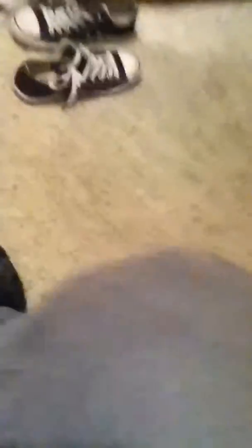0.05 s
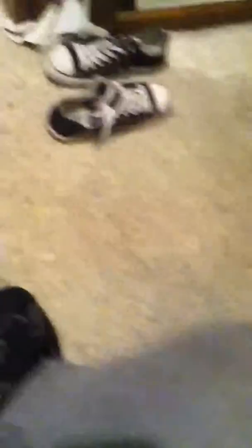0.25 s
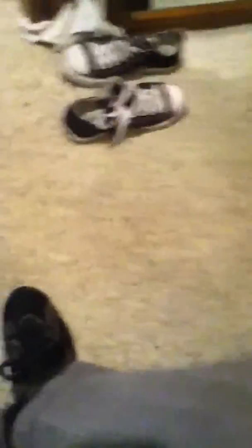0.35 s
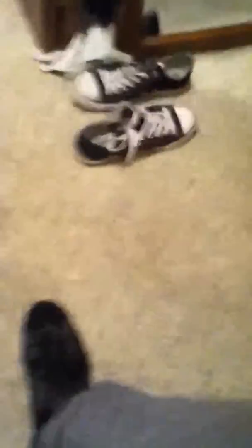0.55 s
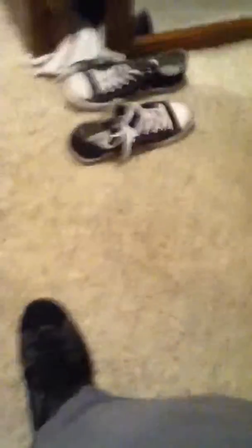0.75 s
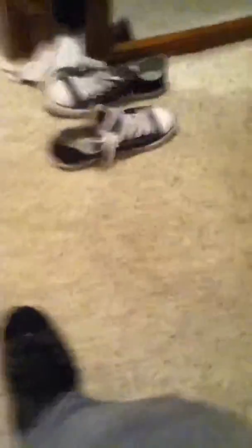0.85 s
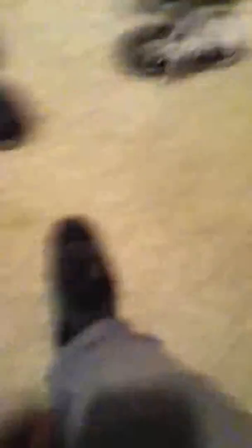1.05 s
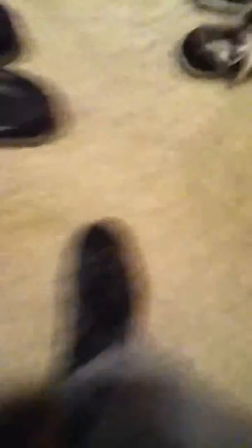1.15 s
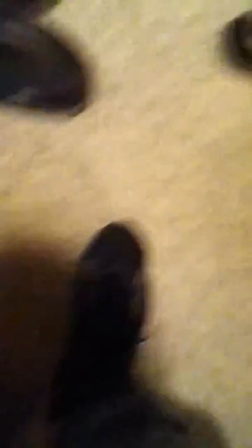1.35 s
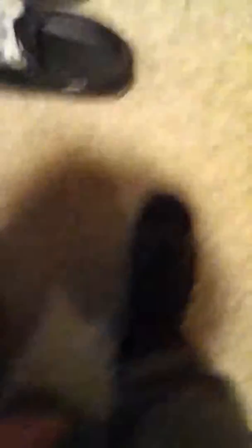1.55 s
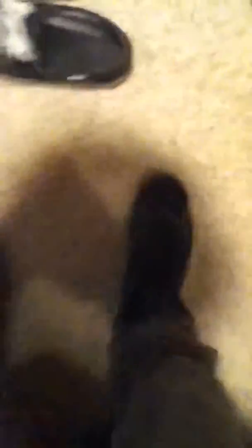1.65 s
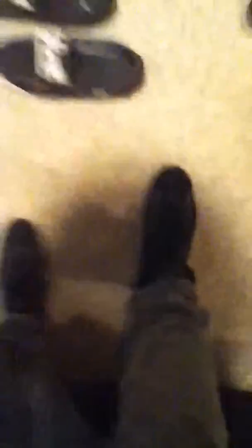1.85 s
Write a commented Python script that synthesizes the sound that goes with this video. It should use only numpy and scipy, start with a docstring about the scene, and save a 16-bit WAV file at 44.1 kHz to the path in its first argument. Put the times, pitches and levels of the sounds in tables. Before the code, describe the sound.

Slow footsteps on carpet, with one sharp shoe snap and rustling trousers.

```python
"""Slow steps on carpet in a small room, heard from a hand-held camera over steady hiss.
Trouser cloth rustles from the start. At 0.25 s a shoe snaps: crack, rattle, hollow ring.
Bright handling ticks and dull crease clicks follow; a heel knocks at 0.59 s.
From about 1 s soles scuff the pile and land with soft thuds, among more ticks and clicks."""
import sys
import numpy as np
from scipy import signal
from scipy.fft import rfft, irfft, next_fast_len
from scipy.io import wavfile
from scipy.ndimage import map_coordinates

SR = 44100
rng = np.random.default_rng(int(sys.argv[2]) if len(sys.argv) > 2 else 0)


def store_pcm(level_fs):
    """Save levels as 16-bit WAV."""
    pcm = np.round(np.clip(level_fs, -1, 1) * 32767).astype(np.int16)
    wavfile.write(sys.argv[1], SR, np.atleast_2d(pcm).T)


N = 83790


def amp(db):
    """Decibels to gain."""
    return 10 ** (np.asarray(db) / 20)


def unit_rms(x):
    """Scale to rms 1."""
    return x / np.sqrt(np.mean(x ** 2) + 1e-20)


def decay(t, t60_s):
    """Gain that falls 60 dB in t60_s."""
    return np.exp(-np.log(1000) * t / t60_s)


def curve_at(points, hz):
    """Interpolate (freq_hz, value) points on a log frequency axis."""
    freqs_hz, values = np.transpose(points)
    return np.interp(np.log(hz + 1), np.log(freqs_hz + 1), values)


def wobble(rate_hz):
    """Straight lines between random knots."""
    return map_coordinates(rng.standard_normal(N), [np.arange(N) * rate_hz / SR], order=1)


def filtered(x, response):
    """Apply response(hz) to the spectrum of x."""
    size = next_fast_len(N + SR // 2)
    return irfft(rfft(x, size) * response(np.fft.rfftfreq(size, 1 / SR)), size)[:N]


def noise(colour, tilt_db_per_oct=0):
    """Coloured noise of rms 1, tilted above 500 Hz."""
    def response(hz):
        octaves = np.log2(np.maximum(hz, 500) / 500)
        return amp(curve_at(colour, hz) + tilt_db_per_oct * octaves)
    return unit_rms(filtered(rng.standard_normal(N), response))


def crack(colour, size=4096):
    """Minimum-phase pulse of a colour, peak 1."""
    cepstrum = irfft(np.log(amp(curve_at(colour, np.fft.rfftfreq(size, 1 / SR)))))
    cepstrum[1:size // 2] *= 2
    cepstrum[size // 2 + 1:] = 0
    pulse = irfft(np.exp(rfft(cepstrum)))
    return pulse / np.abs(pulse).max()


def ring(modes, attack_s):
    """Damped modes after one blow."""
    t = np.arange(SR // 4) / SR
    tones = sum(amp(db) * np.sin(2 * np.pi * hz * t) * decay(t, t60_s) for hz, db, t60_s in modes)
    return tones * (1 - np.exp(-t / attack_s))


def swell(peak_s, level_db, rise_s, fall_s):
    """Gain with a rounded peak; rise_s and fall_s each span 20 dB."""
    roundness = 1.275  # 1 = pointed, 2 = bell
    t = np.arange(N) / SR
    distance = np.maximum((peak_s - t) / rise_s, (t - peak_s) / fall_s)
    return amp(level_db - 20 * distance ** roundness)


def strokes(rows, colour, grain_hz=500, grain_db=2):
    """Friction strokes swell and fade, grainy with catching fibres."""
    out = np.zeros(N)
    for peak_s, level_db, rise_s, fall_s, tilt_db_per_oct in rows:
        friction = noise(colour, tilt_db_per_oct) * amp(grain_db * wobble(grain_hz))
        out += swell(peak_s, level_db, rise_s, fall_s) * unit_rms(friction)
    return out


def add(track, start_s, sound):
    """Mix a sound into the track."""
    part = track[round(start_s * SR):][:len(sound)]
    part += sound[:len(part)]


def in_room(x, wet_db, delay_s=0.006):
    """Add a short room tail; soft furnishings soak up its treble."""
    # reverberation time: freq_hz, t60_s
    room_t60 = [(150, 0.14), (500, 0.35), (2500, 0.16), (10000, 0.3)]
    # tail spectrum: freq_hz, level_db
    colour = [(200, -3.5), (2000, 3.5), (4500, -5.5), (10000, -17)]
    hz, t, spectra = signal.stft(rng.standard_normal(SR // 2), SR, nperseg=256)
    spectra = spectra * decay(t, curve_at(room_t60, hz)[:, None]) * amp(curve_at(colour, hz))[:, None]
    tail = signal.istft(spectra, SR, nperseg=256)[1]
    tail = np.pad(tail / np.linalg.norm(tail), (round(delay_s * SR), 0))
    return x + amp(wet_db) * signal.fftconvolve(x, tail)[:N]


def room_hiss():
    """Steady noise floor of the room."""
    # hiss spectrum: freq_hz, level_db
    colour = [(15, 0), (25, -14.5), (108, -0.5), (212, 0.5), (416, -10), (531, -12.5), (734, -8.5),
              (796, -8.5), (1160, -11), (1520, -13), (5880, -16), (11300, -19), (16000, -29)]
    return amp(-57) * noise(colour)


def trouser_cloth():
    """Cloth slides in swishes, with a bright sheen as the legs pass."""
    # cloth strokes: peak_s, level_db, rise_s, fall_s, tilt_db_per_oct
    swishes = [(.04, -52, 0.29, 0.23, -0.2), (.205, -52, 0.069, 0.041, 1),
               (.267, -39.5, 0.038, 0.038, -2.5), (.33, -51, 0.11, 0.12, 1), (.425, -49.5, 0.15, 0.19, 0),
               (.575, -49.5, 0.084, 0.078, 1), (.65, -49.5, 0.051, 0.033, 0), (.785, -49, 0.23, 0.12, 0.66),
               (1.26, -55.5, 0.36, 0.21, 1.5), (1.61, -58.5, 0.14, 0.16, 3)]
    # swish spectrum: freq_hz, level_db
    swish_colour = [(90, -39), (200, 4.5), (380, 8.5), (900, -5.5), (2200, -1), (4300, -5.5), (8000, -9.5),
                    (12000, -20.5), (16000, -44)]
    # sheen spectrum: freq_hz, level_db
    sheen_colour = [(2000, -16), (5000, -8), (8000, -0.5), (11500, -7), (16000, -17)]
    sheen_gain = swell(peak_s=0.54, level_db=-55.5, rise_s=0.25, fall_s=0.17)
    return strokes(swishes, swish_colour) + sheen_gain * noise(sheen_colour)


def sole_rubs(q=1.56):
    """A loaded sole creeps on the pile and excites one broad resonance."""
    # rubs: peak_s, level_db, rise_s, fall_s, centre_hz
    rubs = [(0.111, -51.5, 0.017, 0.027, 630), (.19, -53.5, 0.045, 0.17, 630),
            (0.604, -47, 0.075, .055, 400), (0.943, -53.5, 0.017, 0.037, 1420), (.95, -60, .1, 0.36, 410),
            (1.052, -49, 0.013, 0.031, 2030), (1.099, -41, 0.0081, 0.048, 382),
            (1.448, -52, 0.054, 0.089, 760), (1.505, -51, .03, 0.055, 2200), (1.68, -60, 0.1, 0.098, 300)]
    out = np.zeros(N)
    for peak_s, level_db, rise_s, fall_s, centre_hz in rubs:
        def band(hz):
            damping = 1j * hz * centre_hz / q
            return (damping / (centre_hz ** 2 - hz ** 2 + damping)) ** 2
        friction = unit_rms(filtered(rng.standard_normal(N), band))
        out += swell(peak_s, level_db, rise_s, fall_s) * friction
    return out


def sole_scuffs():
    """Soles brush the pile."""
    # sole strokes: peak_s, level_db, rise_s, fall_s, tilt_db_per_oct
    scuffs = [(1.079, -37, 0.059, 0.056, -1), (1.45, -51, 0.085, 0.046, -3.5),
              (1.518, -50, 0.053, 0.099, -3.5)]
    # scuff spectrum: freq_hz, level_db
    colour = [(100, -11), (280, 0.5), (700, -4.5), (1300, -1), (2500, -0.5), (4400, 1), (7000, -5),
              (10000, -9), (13000, -21), (16000, -38)]
    return strokes(scuffs, colour)


def crease_clicks(t60_cycles=4.25):
    """Creases in shoe and cloth give way, each at its own heavily damped pitch."""
    # dull clicks: start_s, level_db, pitch_hz
    clicks = [(.0685, -26.5, 3940), (.3996, -34.5, 2500), (.4075, -32.5, 3770), (.4137, -38, 2180),
              (.4226, -33, 1890), (.4304, -37, 2630), (.4418, -36.5, 1870), (.9423, -31, 3800),
              (.9831, -37.5, 2290), (1.0097, -29.5, 4320), (1.0105, -33, 1160), (1.0301, -33.5, 4430),
              (1.4266, -37.5, 950), (1.4346, -37, 1190), (1.4928, -34, 2110)]
    out = np.zeros(N)
    for start_s, level_db, pitch_hz in clicks:
        click = ring([(pitch_hz, 0, t60_cycles / pitch_hz)], attack_s=0.0001)
        add(out, start_s, amp(level_db) * click / np.abs(click).max())
    return in_room(out, wet_db=-15)


def handling_ticks(top_above_hz=10000):
    """Small hard parts touch and ring briefly; glancing touches favour the top mode."""
    # touches: start_s, peak_db, top_boost_db
    ticks = [(0.3539, -25.5, 2), (.8856, -36, 12), (1.1693, -25.5, 2), (1.2253, -33, 12),
             (1.3424, -24.5, 1.5), (1.3455, -30.5, 6)]
    # modes of the parts: pitch_hz, level_db, t60_s
    modes = [(2900, -13, 0.0032), (3950, -12, 0.0041), (8510, 6, 0.0021), (11350, -6, 0.0028)]
    out = np.zeros(N)
    for start_s, peak_db, top_boost_db in ticks:
        boosted = [(hz, db + top_boost_db * (hz > top_above_hz), t60_s) for hz, db, t60_s in modes]
        tick = ring(boosted, attack_s=0.00016)
        add(out, start_s, amp(peak_db) * tick / np.abs(tick).max())
    return out


def footfalls(heel_s=0.5866):
    """A heel knocks through the carpet; softer contacts only thud."""
    # heel knock modes: pitch_hz, level_db, t60_s
    heel_modes = [(191, -12, 0.1), (431, 2, 0.039), (517, -10, 0.028)]
    # heel click spectrum: freq_hz, level_db
    click_colour = [(200, -10), (1000, -1.5), (2200, -6), (3500, -16), (8000, -24), (16000, -57)]
    # weight landing on the floor: start_s, level_db, pitch_hz, t60_s
    thuds = [(1.089, -37, 346, 0.045), (1.091, -38, 557, 0.024), (1.108, -44, 200, 0.064),
             (1.129, -37.5, 127, 0.064), (1.133, -46, 55, 0.094), (1.327, -42.5, 141.5, 0.08),
             (1.497, -47, 95, .05), (1.519, -40.5, 215, 0.084), (1.523, -38.5, 478, 0.039),
             (1.789, -46.5, 97, 0.07)]
    out = np.zeros(N)
    add(out, heel_s, amp(-26.5) * ring(heel_modes, attack_s=0.0023))
    add(out, heel_s, amp(-28) * crack(click_colour))
    for start_s, level_db, pitch_hz, t60_s in thuds:
        add(out, start_s, ring([(pitch_hz, level_db, t60_s)], attack_s=0.0021))
    return in_room(out, wet_db=-17)


def shoe_snap(start_s=0.2485, low_cut_hz=140):
    """One hard crack, a brief rattle and a hollow ring; the small shoe radiates little bass."""
    # crack spectrum: freq_hz, level_db
    crack_colour = [(60, -43), (130, -24), (220, -1.5), (620, -2), (1150, -15), (1800, 2), (2450, 2),
                    (3100, -6.5), (3900, 1.5), (4850, 2.5), (6400, -7), (8700, -19), (11500, -30),
                    (16000, -38)]
    # rattle spectrum: freq_hz, level_db
    rattle_colour = [(100, -32), (400, 2), (1200, -11), (2200, 5), (4400, 0.5), (7000, -6), (12000, -21),
                     (16000, -35)]
    # shoe and floor modes: pitch_hz, level_db, t60_s
    modes = [(195, -39, 0.057), (351, -22, 0.025), (576, -23, 0.024)]
    out, t = np.zeros(N), np.arange(N) / SR
    add(out, start_s, amp(-8.5) * crack(crack_colour))
    add(out, start_s, amp(-27.5) * noise(rattle_colour) * decay(t, t60_s=0.024))
    add(out, start_s, -ring(modes, attack_s=0.00099))
    radiated = filtered(out, lambda hz: 1j * hz / (low_cut_hz + 1j * hz))
    return in_room(radiated, wet_db=-18.5)


def scene():
    """Friction and impacts over room hiss, mono."""
    friction = trouser_cloth() + sole_scuffs() + sole_rubs()
    impacts = shoe_snap() + footfalls() + handling_ticks() + crease_clicks()
    return (room_hiss() + friction + impacts)[None]


def record(dry):
    """The camera thins the deep bass and passes nothing above its band limit."""
    low_cut_hz, top_hz = 28, 16300
    return filtered(dry[0], lambda hz: 1j * hz / (low_cut_hz + 1j * hz) * (hz < top_hz))[None]


dry = scene()
out = record(dry)
store_pcm(out)
```